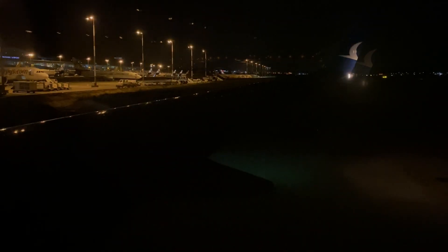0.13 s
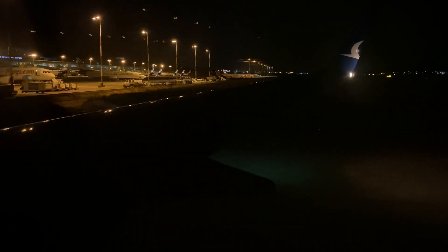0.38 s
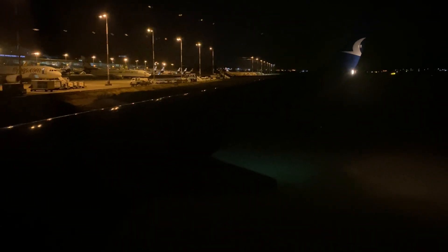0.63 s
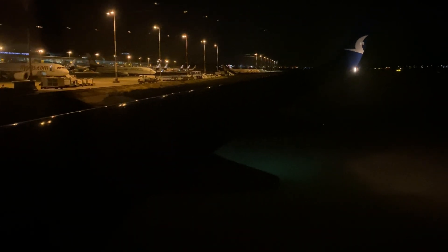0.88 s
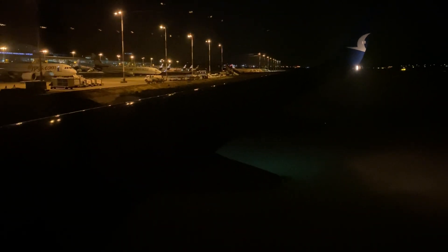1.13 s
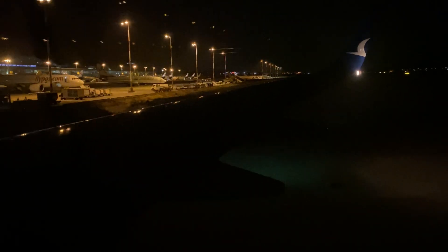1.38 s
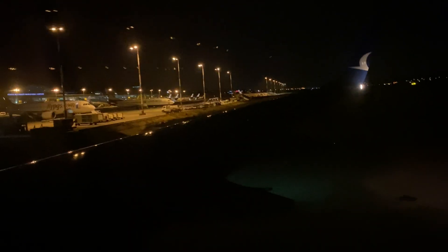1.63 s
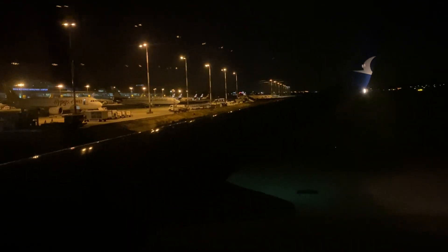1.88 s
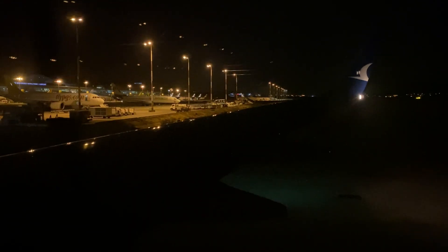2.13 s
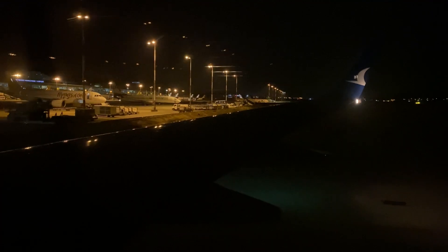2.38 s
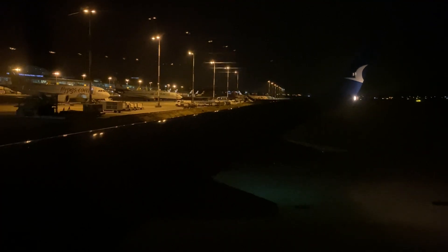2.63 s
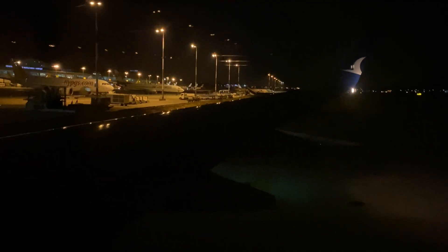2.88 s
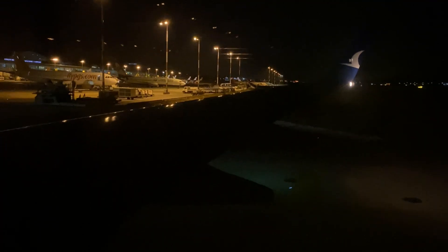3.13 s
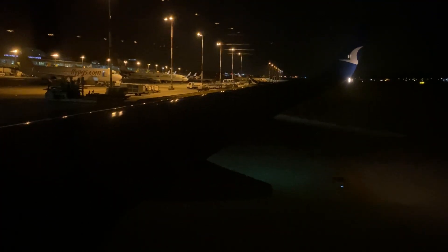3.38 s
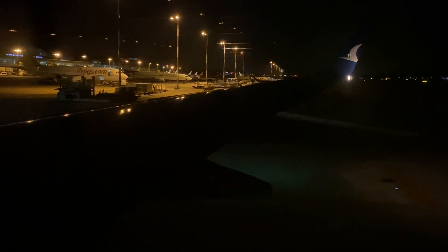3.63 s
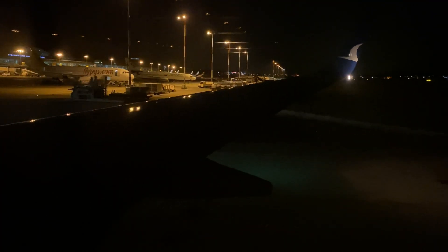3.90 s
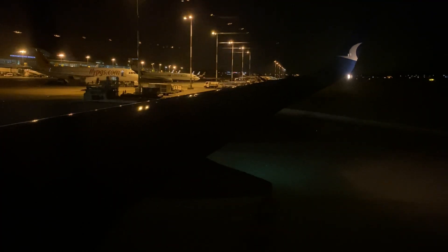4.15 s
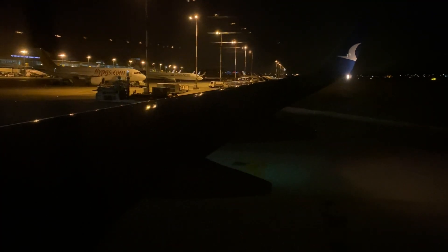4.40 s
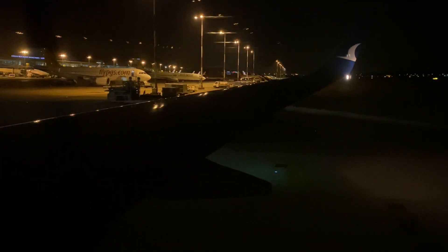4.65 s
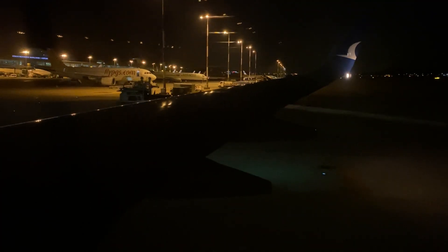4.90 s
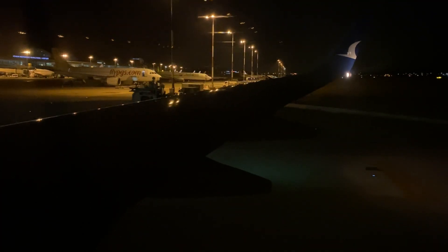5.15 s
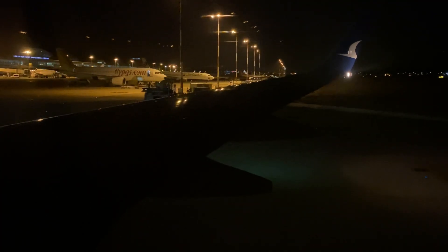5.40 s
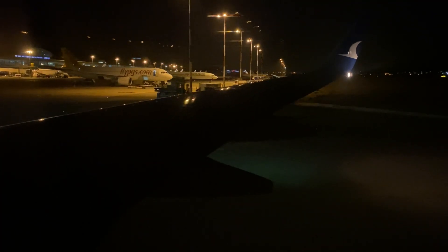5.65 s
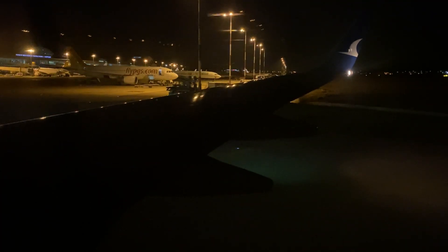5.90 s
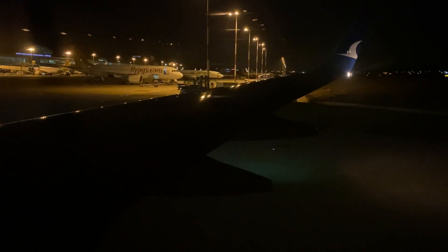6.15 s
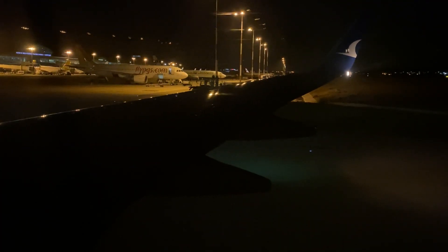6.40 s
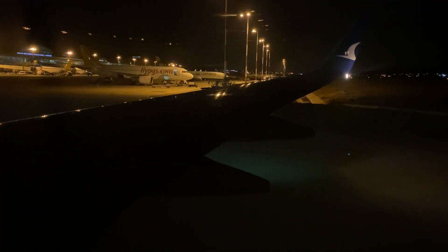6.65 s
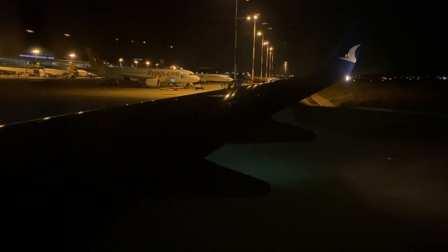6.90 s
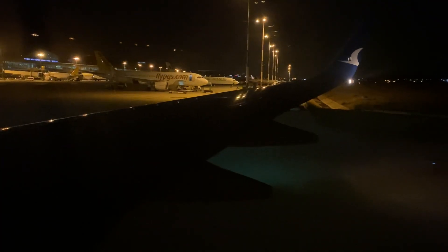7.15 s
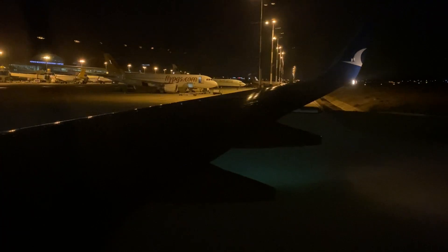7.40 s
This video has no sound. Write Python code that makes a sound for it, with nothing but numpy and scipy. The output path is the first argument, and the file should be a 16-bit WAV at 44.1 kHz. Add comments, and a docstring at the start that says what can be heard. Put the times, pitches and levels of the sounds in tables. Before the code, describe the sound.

A continuous, bass-heavy engine drone fills an airliner cabin as it taxis, heard close to a window over the wing. A very low hull boom wavers and swells several times a second, beside a steady low shaft hum that weakens slightly around 6 s. Above lie a muffled roar, a faint pane hum, thin wandering whines and a light vent hiss from the left. A sharp tick and panel knock come at about 0.1 s, with more at 0.3 s; small ticks, knocks and short cloth rustles continue to 1.9 s, notably near 1, 1.1 and 1.5 s. A dull wheel thud lands around 2.4 s, a firmer knock at 2.8 s. Further thuds follow near 3.9, 4.3, 4.7 and 5.1 s, with a tick and soft rustle at 4 s and light knocks around 5.3 s. A very faint bump at 6.2 s and a last knock at 7.4 s leave the drone running to the end.

```python
"""A fuselage booms and drones under idling engines: inside an airliner cabin taxiing at night, heard by a
phone with two ports at a window over the wing. Shaped noise makes boom, drone, roar, pane hum and a vent
hiss from the left; wandering sines make shaft, pump and fan tones. Ticks are noise cracks with a short ring,
panel knocks are chattering blows on ringing modes, cloth rustles as grains near the phone, and thuds of
band noise mark the wheels dropping over joints."""
import sys
import numpy as np
from scipy import signal
from scipy.fft import rfft, irfft, next_fast_len
from scipy.io import wavfile
from scipy.ndimage import uniform_filter1d

SR = 44100
rng = np.random.default_rng(int(sys.argv[2]) if len(sys.argv) > 2 else 0)


def level_to_linear(level):
    """Convert decibel levels to linear amplitude factors, elementwise."""
    exponent = np.asarray(level, float) / 20
    return 10 ** exponent


def materialize(psi):
    """Save the field psi as 16-bit PCM at rate SR to the path in sys.argv[1].

    A 1-D psi becomes a single channel; in a 2-D psi each row is a channel.
    """
    bounded = np.clip(np.atleast_2d(psi).T, -1, 1)
    quanta = np.round(bounded * 32767).astype(np.int16)
    wavfile.write(sys.argv[1], SR, quanta)


N = 332073
T = np.arange(N) / SR
SIZE = next_fast_len(N + SR // 10)
HZ = np.maximum(np.arange(SIZE // 2 + 1) * SR / SIZE, 1)


def level(x, db):
    """Scale to an rms level."""
    return x * level_to_linear(db) / np.sqrt(np.mean(x ** 2))


def curve(rows):
    """Join (s, value) rows by straight lines."""
    return np.interp(T, *np.transpose(rows))


def colour(points):
    """Gain per spectral bin from (Hz, dB) points over log frequency, silent outside them."""
    hz, db = np.transpose(points)
    return level_to_linear(np.interp(np.log(HZ), np.log(hz), db, left=-200, right=-200))


def walk(rate_per_s):
    """Random levels held 1 / rate s and slewed twice; spread near 1."""
    hold = int(SR / rate_per_s)
    steps = np.repeat(rng.standard_normal(N // hold + 1), hold)
    return 1.3 * uniform_filter1d(uniform_filter1d(steps, hold), hold)[:N]


def band_noise(edges_hz, shape):
    """White noise through a second-order band-pass."""
    sos = signal.butter(2, edges_hz, "band", fs=SR, output="sos")
    return signal.sosfilt(sos, rng.standard_normal(shape))


def turbulence(points, db, swell_db, flicker_db, flicker_per_s):
    """Coloured noise in overlapping octave bands that swell together and flicker alone."""
    spectrum = rfft(rng.standard_normal(SIZE)) * colour(points)
    swell, out = walk(1.59), 0
    octave = np.log2(HZ / points[0][0])
    for k in range(int(np.log2(points[-1][0] / points[0][0])) + 2):
        band = irfft(spectrum * np.maximum(1 - abs(octave - k), 0), SIZE)[:N]
        out = out + band * level_to_linear(swell_db * swell + flicker_db * walk(flicker_per_s))
    return level(out, db)


def resonance(hz, width_hz):
    """Noise ringing in one broad resonance, as an analytic signal."""
    ring = np.exp(-.5 * ((HZ - hz) / (width_hz / 2)) ** 2)
    return signal.hilbert(irfft(rfft(rng.standard_normal(SIZE)) * ring, SIZE))[:N]


def pair(alike, opposed):
    """Left and right from what the ports share and what they hear in opposition."""
    return np.array([alike + opposed, alike - opposed])


def right_port(x):
    """A source on the line of the ports reaches the right one later; port cavities turn its phase further."""
    lag_s, turn_cycles = .000153, .11
    hold_hz = 4800  # below this the phase shift stays constant
    cycles = np.maximum(HZ, hold_hz) * lag_s + turn_cycles
    return irfft(rfft(x, SIZE) * np.exp(-2j * np.pi * cycles), SIZE)[:N]


def from_left(x):
    """Left and right of a source on the left."""
    return np.array([x, right_port(x)])


def panned(pan_db):
    """Left and right gains from left minus right dB."""
    return level_to_linear(np.array([[pan_db], [-pan_db]]) / 2)


def boom():
    """The lowest bending resonance of the hull: narrowband noise that wavers and swells in level."""
    # slow level of the boom under its swells: start_s, level_db
    base = [(0, -25.5), (1.5, -22.5), (2.3, -21), (3.5, -23), (5, -22), (6, -21), (7.53, -22)]
    # loudest swells of the wavering boom: peak_s, rise_db, length_s (two sigma)
    swells = [(0.45, 6, .06), (0.988, 8.5, .08), (1.68, 8, .06), (2.027, 6.5, .1), (2.2, 6.5, 0.09),
              (2.45, 6, .14), (2.8, 10, 0.073), (3.19, 6.5, .11), (3.89, 7, 0.091), (4.04, 9, 0.1),
              (4.746, 9, .1), (4.88, 6, .05), (5.13, 8.5, .12), (5.29, 6, .09), (5.47, 4.5, 0.14),
              (5.87, 5, 0.09), (6.25, 7.5, .07), (6.61, 7, .09), (6.74, 6, .05), (7.12, 5, .06),
              (7.4, 8, 0.095)]
    z = resonance(hz=53.5, width_hz=24)
    swell_db = sum(db * np.exp(-.5 * ((T - s) / (length / 2)) ** 2) for s, db, length in swells)
    waver_db = 1.5 * walk(9)
    # dividing by part of the envelope evens out the noise's own beating
    steadied = z.real / abs(z) ** 0.71
    return level(steadied, 0) * level_to_linear(curve(base) + swell_db + waver_db)


def drone():
    """Engine drone through floor and walls, part alike at both ports and part opposed."""
    # spectrum alike at both ports: pitch_hz, relative_db_per_hz
    alike = [(20, -36), (40, -9.5), (65, -1), (92, -4.5), (132, -10), (160, -4), (185, -8.5), (228, -3.5),
             (258, -14), (275, -10.5), (320, -8), (400, -21.5), (500, -26), (560, -35.5), (780, -62)]
    # spectrum opposed at the ports: pitch_hz, relative_db_per_hz
    opposed = [(20, -32), (33, -20), (50, -7), (64, -4.5), (100, -6.5), (146, -6), (185, -5), (205, -4.5),
               (275, -7), (332, -0.5), (406, -11), (497, -8), (600, -22), (780, -46)]
    return pair(turbulence(alike, -17, swell_db=0.34, flicker_db=1.24, flicker_per_s=6),
                turbulence(opposed, -32, swell_db=0.66, flicker_db=0.77, flicker_per_s=13))


def roar():
    """Jet roar and cabin air from all around, coloured by the window recess."""
    # spectrum alike at both ports: pitch_hz, relative_db_per_hz
    alike = [(400, -6), (560, -7.5), (700, -5), (800, -6), (886, -10), (1040, -3), (1130, -6.5),
             (1200, -13.5), (1480, -12), (1560, -18), (2160, -20), (2400, -20.5), (2750, -18.5),
             (3140, -27), (4720, -26), (7500, -33), (9500, -48.5)]
    # spectrum opposed at the ports: pitch_hz, relative_db_per_hz
    opposed = [(320, -29), (540, -4), (727, -5), (803, -5), (896, -7), (1130, -4.5), (1470, -9),
               (1770, -22.5), (2210, -14.5), (2520, -26), (2750, -22), (3750, -28.5), (4280, -25),
               (6500, -28.5), (7500, -29), (9750, -51), (16500, -120)]
    return pair(turbulence(alike, -37.5, swell_db=0.16, flicker_db=1.0, flicker_per_s=7.7),
                turbulence(opposed, -39, swell_db=.3, flicker_db=0.73, flicker_per_s=11))


def pane():
    """The window pane hums on a broad note that comes and goes."""
    hum = resonance(hz=647, width_hz=53).real
    return level(hum * level_to_linear(2.2 * walk(5)), -43)


def vent():
    """Air hissing from one spot on the left."""
    # hiss spectrum: pitch_hz, relative_db_per_hz
    hiss = [(4500, -31), (6500, -4), (8000, -2), (10000, -2), (12500, -5.5), (14000, -6), (16500, -5.5)]
    return from_left(turbulence(hiss, -52, swell_db=0.13, flicker_db=0.86, flicker_per_s=11))


def tones():
    """Engine shaft line of wavering phase; pump and fan-blade lines wander in pitch and strength."""
    # shaft tone through the wing: start_s, level_db
    shaft = [(0, -20), (.3, -18), (3.5, -20), (6.2, -24), (7.53, -22)]
    # pump and fan lines: pitch_hz
    pitches = [336.5, 501, 673, 1489.5, 1683, 2113.5, 2979]
    # one row per pitch: left_db, right_db, right_lag_cycles, wander_hz
    lines = [(-37.5, -38.5, 0.056, 0.989), (-50.5, -45, 0.27, 0.607), (-46.5, -57, 0.06, 1.45),
             (-54, -49, 0.45, 1.69), (-60.5, -62.5, 0.18, 1.32), (-75, -77, 1, 0.52), (-80, -64, .05, 2.3)]
    shaft_hz = 146.0
    wave = np.sin(2 * np.pi * (shaft_hz * T + .03 * walk(3)))
    out = np.sqrt(2) * level_to_linear(curve(shaft)) * wave * panned(-.7)
    for hz, (left_db, right_db, lag, wander_hz) in zip(pitches, lines):
        cycles = np.cumsum(hz + wander_hz * walk(2.5)) / SR + rng.random()
        wave = np.sin(2 * np.pi * (cycles - np.array([[0], [lag]])))
        strength_db = np.array([[left_db], [right_db]]) + 2.0 * walk(1.8)
        out = out + np.sqrt(2) * level_to_linear(strength_db) * wave
    return out


def ticks():
    """A small hard part snaps: a wide crack with a very short ring, reaching the left port first."""
    # bright ticks: start_s, peak_db (mean of ports), centre_hz, left_minus_right_db
    snaps = [(0.0731, -20.5, 5750, -5), (0.3204, -28.5, 4440, 0), (1.1428, -36, 4650, -1.5),
             (1.4094, -36, 3310, 0), (1.4596, -24, 3260, -6), (1.757, -31, 3700, -4),
             (1.8412, -30, 3280, -5), (4.0324, -33, 7010, -1.0)]
    ring_t60_s, crack_t60_s, rise_s = .004, .012, 0.00073
    out, t = np.zeros((2, N + SR)), T[:SR // 20]
    for s, peak_db, hz, pan_db in snaps:
        crack = band_noise([hz * .55, min(hz * 2.3, 15000)], len(t))
        crack = crack * level_to_linear(-60 * t / crack_t60_s) * (1 - np.exp(-t / rise_s))
        ring = np.sin(2 * np.pi * hz * t) * level_to_linear(-60 * t / ring_t60_s)
        snap = 2.2 * crack + ring
        out[:, int(s * SR):][:, :len(t)] += level_to_linear(peak_db) * panned(pan_db) * snap / abs(snap).max()
    return np.array([out[0, :N], right_port(out[1, :N])])


def knocks():
    """A loose panel chatters at each blow and rings its short modes; harder blows favour the upper ones."""
    # blows: start_s, peak_db (before panning), left_minus_right_db, hardness_0_to_1
    blows = [(0.1072, -19, 0, 0.7), (0.3446, -20.5, -12.5, 0.24), (0.3744, -30, -1.5, 0.6),
             (0.7472, -26, 14, 0.3), (1.0494, -29, 2, 0.3), (1.1894, -31, -9, 0.6), (1.8412, -27, -7, 0.7),
             (2.8474, -18.5, -7, 0.2), (3.3504, -30, -0.5, 0.4), (4.0332, -27, -2.0, 0.5),
             (4.7192, -25, -6, 0.3), (5.3103, -26, -5, 0.2), (5.4326, -28.5, -6, 0.35),
             (7.4305, -27, -3, 0.5)]
    # panel modes: pitch_hz, level_db (at hardness 0.5), free_t60_s
    panel = [(780, -1, .04), (1080, 1, .06), (1300, -3, .03), (1700, -5, .02), (2390, 0, .045),
             (3000, -5, .015), (3600, -9, .012), (4400, -11, .012)]
    ring_share, rattle_s, contact_hz = .45, .0085, 3540  # ring_share: fraction of the free t60
    out, t = np.zeros((2, N + SR)), T[:SR // 8]
    hz, db, free_t60_s = np.transpose(panel)[:, :, None]
    contact = signal.butter(2, contact_hz, fs=SR, output="sos")
    for s, peak_db, pan_db, hard in blows:
        chance = rng.standard_normal((2, len(panel), 1))
        mode_db = db + 12 * (hard - .5) * np.log2(hz / 2000) + 1.5 * chance[0]
        gain = level_to_linear(mode_db - 60 * t / (free_t60_s * ring_share))
        ring = np.sum(gain * np.sin(2 * np.pi * hz * (1 + .015 * chance[1]) * t), axis=0)
        shared, apart = rng.standard_normal((2, len(t))) * np.exp(-t / rattle_s)
        # the first contact is one sharp blow, the chatter after it comes from all over the panel
        shared[0] += 10
        knock = signal.fftconvolve(pair(shared, 0.52 * apart), ring[None])[:, :len(t)]
        # a yielding contact leaves out the top
        knock = signal.sosfilt(contact, knock)
        out[:, int(s * SR):][:, :len(t)] += level_to_linear(peak_db) * panned(pan_db) * knock / abs(knock).max()
    return out[:, :N]


def rustle():
    """Dense grains of cloth rubbing the phone; each stroke rises quickly and dies away."""
    # strokes: peak_s, level_db (rms at the peak), rise_s (20 dB), fade_s (20 dB)
    strokes = [(0.32, -48, .025, .2), (0.955, -42, .06, .17), (1.143, -46, .006, .15),
               (1.366, -48, .015, 0.1), (1.465, -46, .01, .33), (4.04, -48, .07, 0.5)]
    # cloth spectrum: pitch_hz, relative_db_per_hz
    cloth = [(1200, -14), (2800, 3), (4500, -1), (8000, -2), (11000, -7), (16000, -11)]
    gain = 0
    for s, db, rise_s, fade_s in strokes:
        gain = gain + level_to_linear(db - 20 * np.where(T < s, (s - T) / rise_s, (T - s) / fade_s))
    grain_db = 1.5 * np.repeat(rng.exponential(size=SIZE // 32 + 1), 32)[:SIZE]
    grains = rng.standard_normal(SIZE) * level_to_linear(grain_db)
    rubbing = irfft(rfft(grains) * colour(cloth), SIZE)[:N]
    return from_left(gain * level(rubbing, 0))


def bumps():
    """Wheels drop over joints: a dull thud, and a jolt of the phone felt oppositely at the ports."""
    # thuds: start_s, peak_db (before the port mix), centre_hz
    drops = [(2.374, -7, 77), (3.853, -9.5, 80), (4.325, -10.5, 77.4), (4.707, -5, 78), (5.083, -4.5, 80),
             (6.22, -21, 81)]
    t60_s, rise_s, opposed_db = 0.31, 0.029, -18
    out, t = np.zeros((2, N + SR)), T[:SR // 2]
    for s, peak_db, hz in drops:
        noise = band_noise(np.clip([hz * 0.49, hz * 1.76], 20, 400), (2, len(t)))
        thud = noise * (1 - np.exp(-t / rise_s)) * level_to_linear(-60 * t / t60_s)
        thud = level_to_linear(peak_db) * thud / abs(thud).max(axis=1, keepdims=True)
        out[:, int(s * SR):][:, :len(t)] += pair(0.75 * thud[0], level_to_linear(opposed_db) * thud[1])
    return out[:, :N]


def scene():
    """All sources at the two ports."""
    steady = boom() + drone() + roar() + pane() + vent() + tones()
    return steady + ticks() + knocks() + rustle() + bumps()


def band_limit(x):
    """A steep low-pass at the top of the band."""
    return signal.sosfilt(signal.butter(12, 15830, fs=SR, output="sos"), x)


def record(dry):
    """The ports differ a little in colour, the deepest bass is cut, the level comes up in the first moments."""
    # port difference: pitch_hz, left_minus_right_db
    ports = [(60, -0.5), (110, -0.5), (200, 0), (370, -1.5), (680, 0.0), (1240, -3), (2280, 1), (4180, -4),
             (7670, 0.5), (14100, 0.5)]
    # half the difference goes to each port
    tilt = np.sqrt(colour([(1, ports[0][1])] + ports + [(SR, ports[-1][1])]))
    x = irfft(rfft(dry, SIZE) * np.array([tilt, 1 / tilt]), SIZE)[:, :N]
    low_cut_hz = 40
    x = signal.sosfilt(signal.butter(3, low_cut_hz, "high", fs=SR, output="sos"), x)
    fade_in_db = -5 * np.exp(-T / .07)
    return band_limit(x * level_to_linear(fade_in_db))


dry = scene()
out = record(dry)
materialize(out)
```